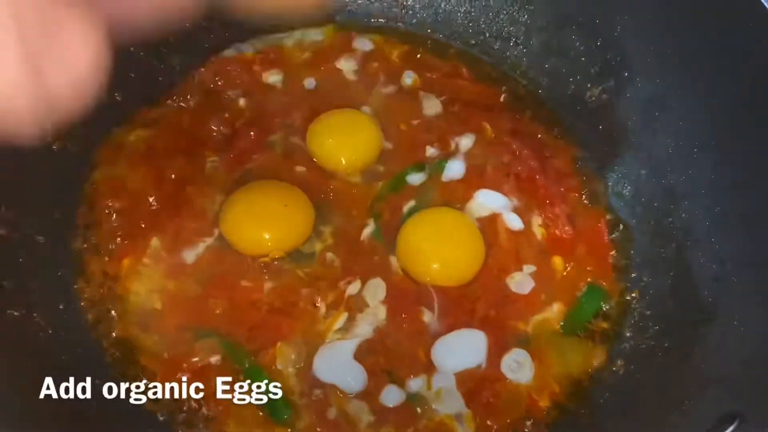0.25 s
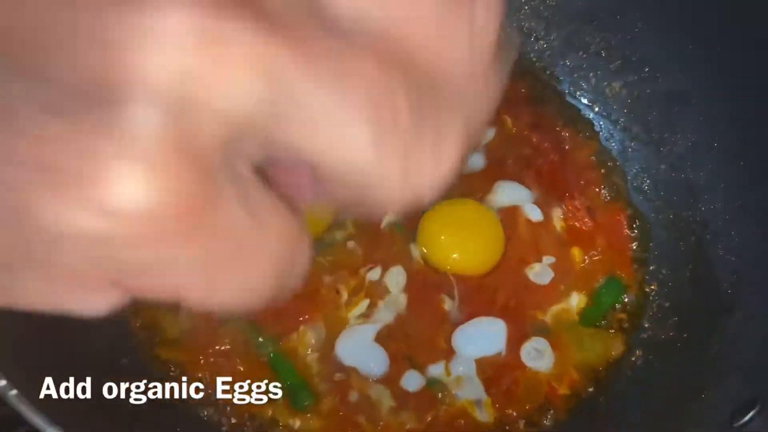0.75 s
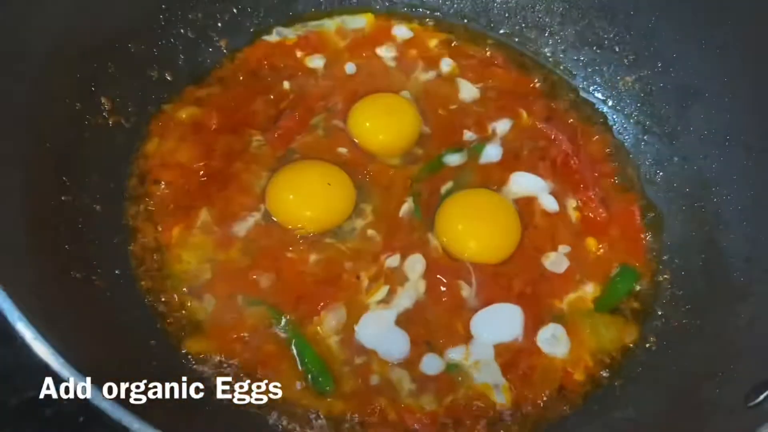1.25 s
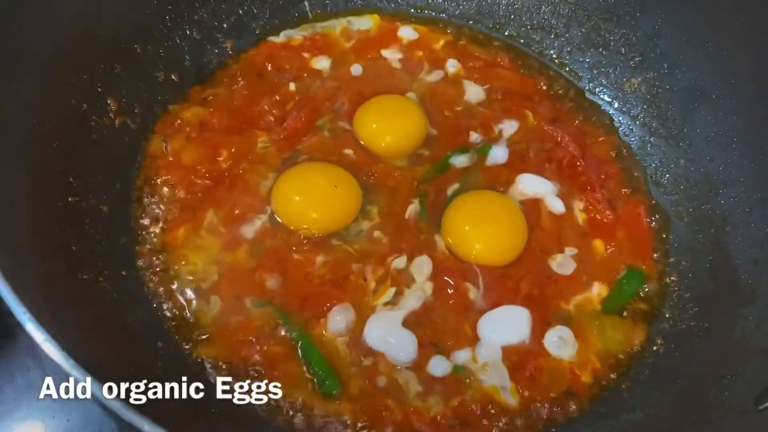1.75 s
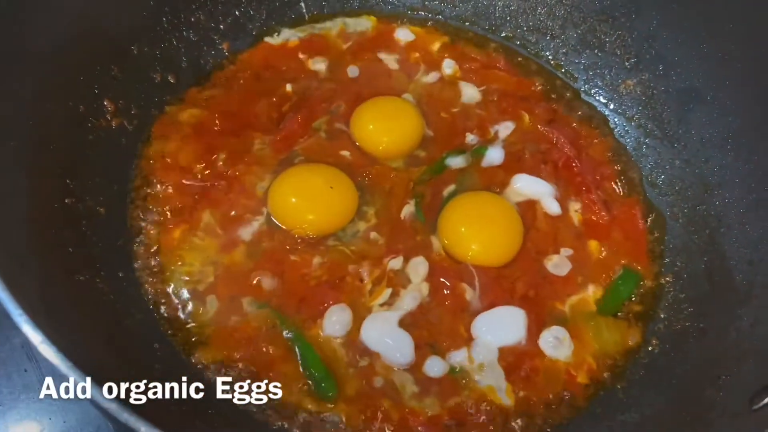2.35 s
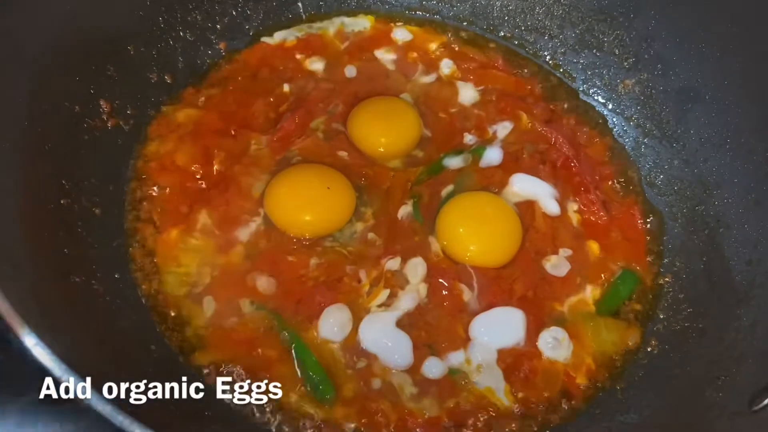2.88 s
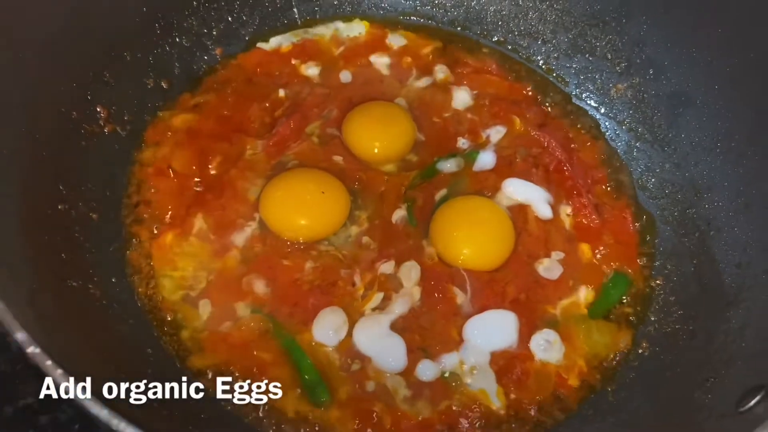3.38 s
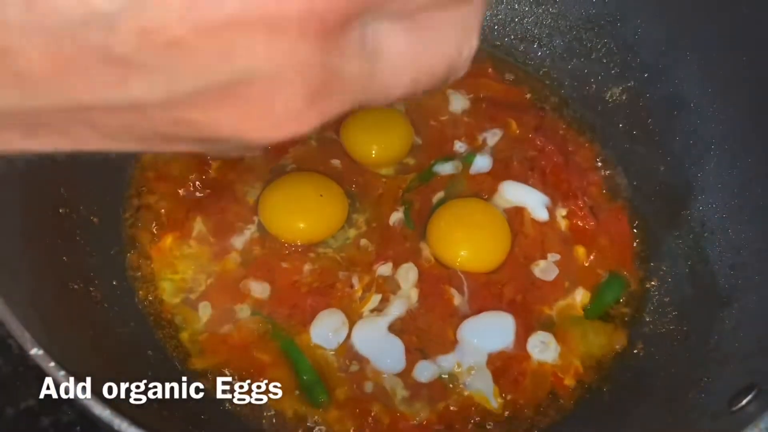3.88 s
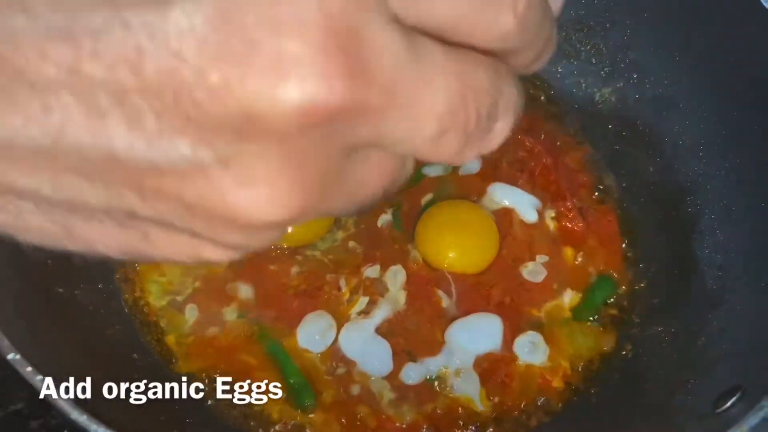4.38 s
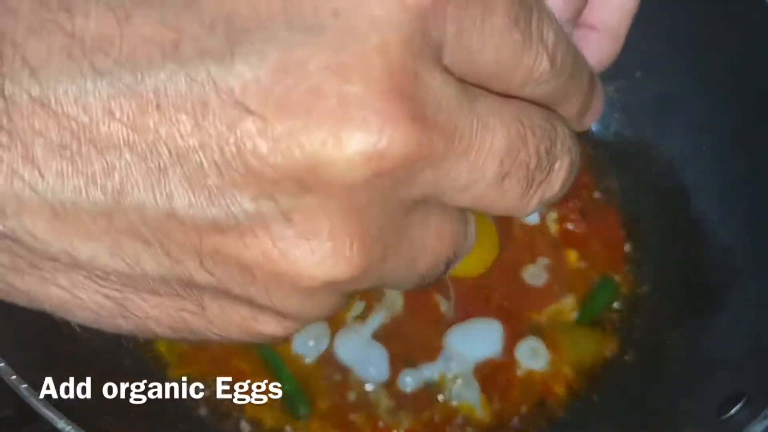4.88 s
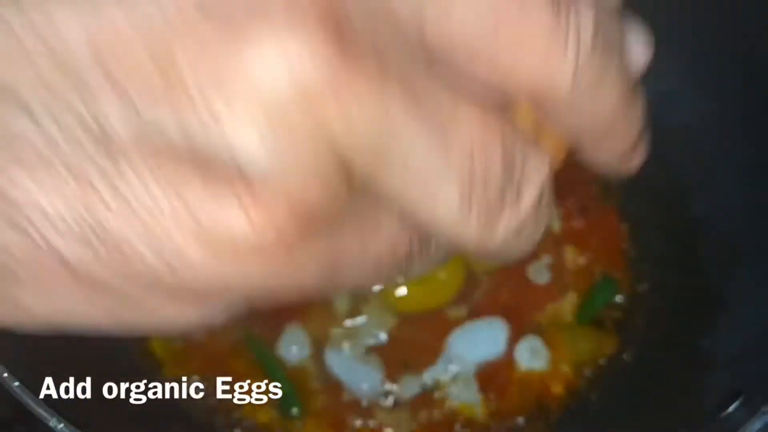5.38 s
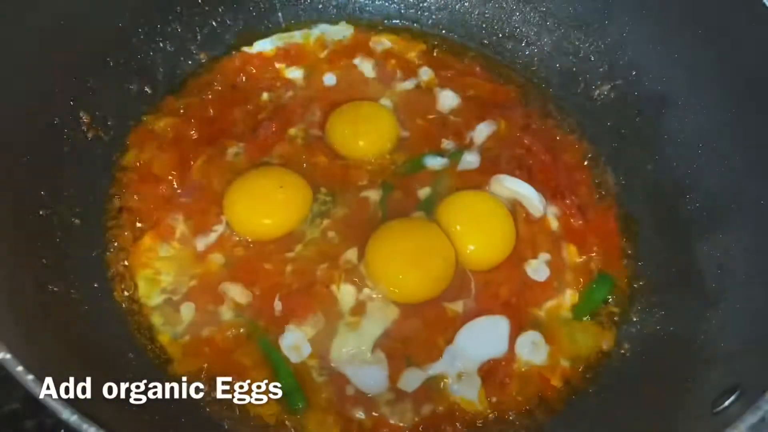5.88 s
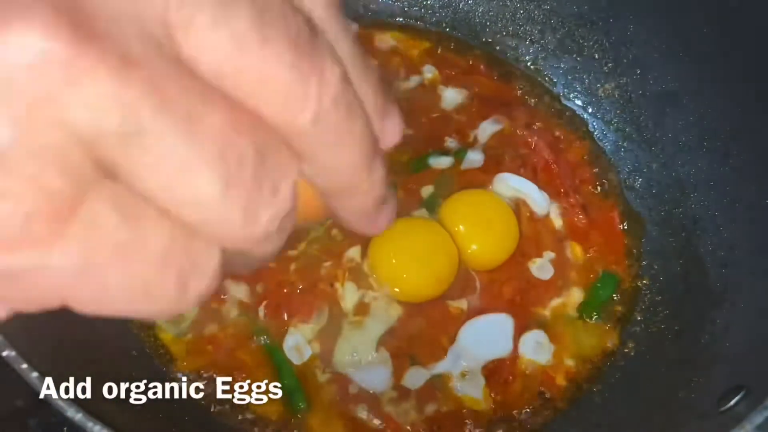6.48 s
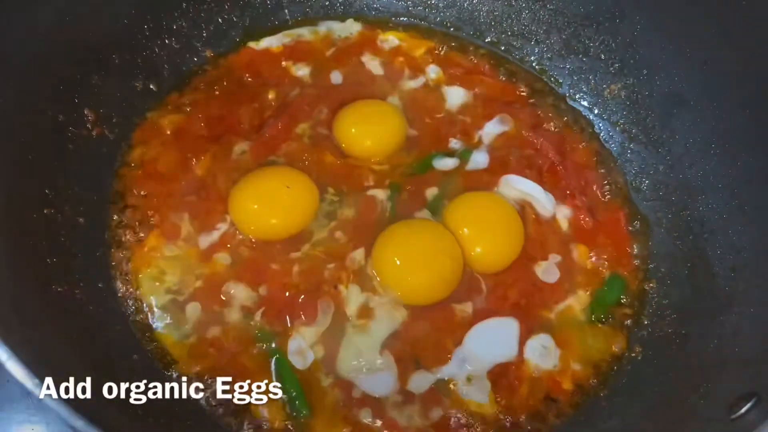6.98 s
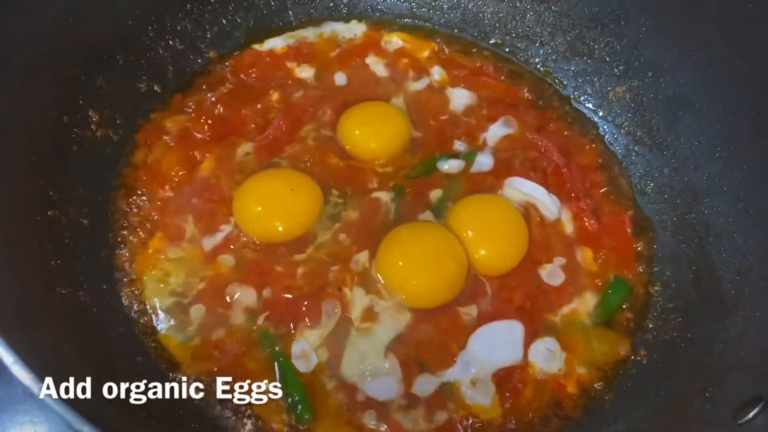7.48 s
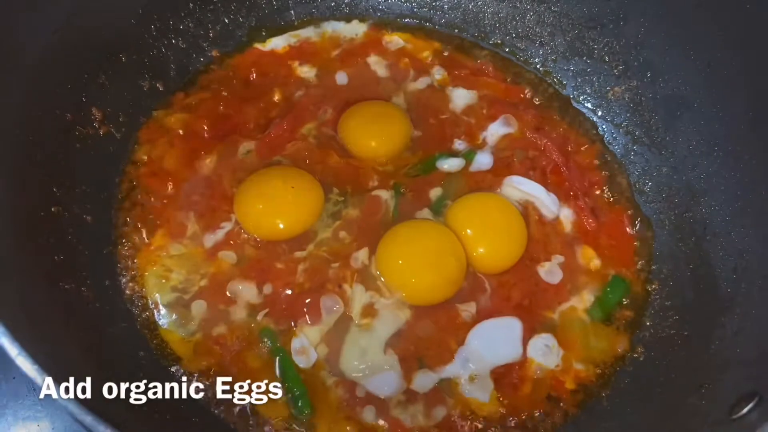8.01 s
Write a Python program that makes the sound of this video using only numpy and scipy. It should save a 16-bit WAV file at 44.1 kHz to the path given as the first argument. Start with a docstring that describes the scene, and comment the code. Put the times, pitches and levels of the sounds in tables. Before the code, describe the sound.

Thick tomato sauce fries steadily in a pan above a low burner roar, hissing, plopping and spitting. Around one second, hollow eggshell pieces clack together. At about three seconds an egg smashes loudly on a counter, which booms briefly. After more frying and small flares, a shell is rapped on steel, crunching and ringing. Close stereo microphone, small kitchen.

```python
"""Masala sizzles in a pan over a roaring burner: filtered noise for hiss and roar, short dying tones for
bubbles, and clicks for spitting oil. Eggshell pieces clack as noise bursts through cup resonances.
An egg is smashed on the counter, heard as gritty bursts, thuds and booming modes; a later shell is rapped
with steel that crunches and rings. A small kitchen answers the egg sounds with a diffuse noise tail.
Left and right differ in phase and level, and are more alike in some bands than in others."""
import sys
import numpy as np
from scipy import signal
from scipy.fft import rfft, irfft, next_fast_len
from scipy.io import wavfile

SR = 44100
rng = np.random.default_rng(int(sys.argv[2]) if len(sys.argv) > 2 else 0)


def transcribe(u):
    """Save the signal u as a 16-bit wav file named by the first command-line argument.

    u: samples, shape (n,) or (channels, n), limited to [-1, 1]; the rate is SR.
    q: integer samples, one column per channel.
    """
    v = np.clip(np.atleast_2d(u).T, -1, 1)
    q = np.round(v * 32767).astype(np.int16)
    wavfile.write(sys.argv[1], SR, q)


N = 363825

# Spectrum of the burner roar: (frequency [Hz], relative level [dB])
ROAR_SPECTRUM = [(25, -40), (50, -3.5), (85, -2.5), (130, -2), (185, 0), (230, -5.5), (400, 0), (700, -1),
                 (1300, -5), (2100, -3), (2700, -4.5), (5000, -19.5)]
# Air resonances of the pan: (frequency [Hz], full width at half the lift [Hz], lift [dB])
PAN_RESONANCES = [(487, 33, 4.5), (1013, 314, 9), (1469, 194, 6.5), (1931, 30, 7.5), (3023, 180, 5),
                  (3500, 56, 8), (3840, 28, 8), (4180, 72, 7.5), (4400, 53, 1.5), (5030, 330, 3)]
# Spectrum of frying oil: (frequency [Hz], relative level [dB])
SIZZLE_SPECTRUM = [(500, -24), (1500, -16), (2300, -6), (2620, -12), (3050, -3), (4200, -2.5), (5100, -.7),
                   (6200, -2.6), (6700, -4.5), (7600, -3.5), (9500, -8), (12500, -11), (15800, -14.5)]
# Moments when the frying livens: (time of the height [s], lift [dB], spread [s])
FRYING_FLARES = [(1.5, 0.8, 0.55), (5.45, 5.5, 0.029), (6.49, 5.5, 0.021)]
# Largest bubbles: (time [s], level [dB], pitch [Hz], decay [cycles])
LARGE_BUBBLES = [(0.185, -19.5, 5200, 3.7), (.308, -14, 6000, 3.5), (0.346, -22, 5130, 4),
                 (.651, -22, 5050, 3), (.923, -19, 3840, 1.7), (1.264, -27, 5010, 4),
                 (1.511, -24, 4970, 3.7), (1.646, -18, 5060, 9.7), (1.945, -17, 5100, 2.7),
                 (2.05, -25, 4200, 4.4), (2.306, -20, 5020, 6.4), (2.691, -21, 1390, 1.4),
                 (3.276, -28, 1440, 1.5), (3.318, -22, 1420, 1), (3.392, -27, 1020, 1.17),
                 (3.769, -23, 4900, 2.2), (3.948, -22, 5470, 2.2), (4.222, -17, 4100, 1.8),
                 (4.228, -18, 3570, 2.1), (4.513, -20, 5020, 3), (4.653, -22, 4950, 3.5),
                 (4.823, -23, 5440, 3), (5.022, -15, 5100, 1.6), (5.116, -24, 5430, 2),
                 (5.35, -24.5, 5400, 6), (5.362, -29, 4080, 4.6), (5.604, -16, 2200, 0.48),
                 (5.7405, -16, 4750, 1.4), (5.788, -16, 5060, 1.8), (5.926, -24, 4200, 4),
                 (6.450, -18.5, 4830, 5.7), (6.695, -21.5, 4400, 4.5), (7.840, -19.5, 5140, 2.4),
                 (7.935, -21.5, 4890, 13), (8.019, -25, 3860, 4.2), (8.126, -23.5, 5000, 5)]
# Sharpest spits of oil: (time [s], level [dB])
OIL_SPITS = [(.957, -15), (2.628, -12.5), (2.691, -20), (2.921, -14.5), (3.769, -14.5), (4.035, -14),
             (4.971, -13), (5.116, -16.5), (5.709, -23), (5.740, -14), (5.788, -21), (6.403, -15),
             (6.733, -13), (7.034, -14)]
# Shell pieces knocking and crunching: (time [s], level [dB], cup resonance [Hz],
# lower mode relative to the main one [dB], decay [ms], splinters relative to the cup [dB])
SHELL_CLACKS = [(.947, -30.5, 3050, -12, 13, -2), (0.973, -34.5, 1950, -10, 26, -4),
                (0.988, -26, 1900, -4, 3.2, -16), (1.0415, -17.5, 2000, -14, 2, -14),
                (1.076, -16, 1950, 1, 2.44, -4.5), (1.156, -16, 1970, -13, 4.7, -10.5),
                (1.170, -29, 1950, -6, 3, -1), (1.53, -41, 1820, -6, 110, -12),
                (1.823, -24, 2590, -11, 6.4, -2), (3.108, -27, 2840, -9, 6, -8),
                (4.919, -27.5, 2240, -12, 7.3, 2.5)]
# Egg smashed on the counter: (time [s], level [dB], decay [ms])
EGG_SMASHES = [(3.1103, -10, 3.2), (3.1128, -8, 3.5), (3.1160, -11.5, 4.6), (3.151, -30, 3.5)]
# Spectrum of the smash: (frequency [Hz], relative level [dB])
SMASH_SPECTRUM = [(60, -18), (250, -14), (600, 5), (1000, -5), (1300, -2.5), (1650, 5.5), (2150, -2.5),
                  (2450, -17), (2900, -6), (3600, -5.5), (6000, -6), (6850, -1.5), (7400, -2.5),
                  (10500, -10.5), (16000, -19)]
# Dull shudders of the counter: (time [s], level [dB], centre frequency [Hz], decay [ms])
COUNTER_BUMPS = [(.952, -35.5, 403, 17), (.956, -35.5, 170, 15.7), (3.111, -37, 55, 100),
                 (3.113, -32, 151, 62), (3.122, -27, 480, 22), (3.160, -20, 410, 14), (3.2, -38, 312, 53),
                 (3.231, -31, 450, 16), (3.244, -37, 103, 110)]
# Soft, rounded thumps on the counter: (time [s], level [dB], pitch [Hz], swell [ms])
COUNTER_THUMPS = [(.954, -33.5, 93.5, 7.1), (3.1495, -12, 466, 2.1), (6.18, -41, 112, 8.2),
                  (7.381, -45, 106, 7.5), (8.029, -37, 377, 3.1), (8.039, -32, 132, 5.5),
                  (8.061, -32, 143, 5.8), (8.092, -40, 122, 15), (8.124, -41, 121, 7)]
# Booming modes of the counter: (frequency [Hz], level [dB], time to fall 60 dB [s])
COUNTER_MODES = [(91, -37.5, 2.5), (99.4, -50, 1.3), (111, -40, 1.2), (129, -32, .65), (187.4, -46.5, 2.5),
                 (249, -36, 0.8), (275.6, -32, 0.62), (399, -24.5, 0.29), (476, -29, 0.33),
                 (592, -27.5, 0.24), (930, -23.5, 0.2), (1550, -21.5, 0.096)]
# Steel against shell, which gives way in steps: (time [s], level relative to the crunch [dB], decay [ms])
STEEL_RAPS = [(7.372, -13, 5.9), (7.3795, 6, 4), (7.3839, 5, 5.2), (7.388, -20, 6.9)]
# Ringing modes of the steel: (frequency [Hz], level [dB], time to fall 60 dB [s])
STEEL_MODES = [(1410, -49, 0.27), (1950, -42, .2), (2440, -36, 0.2), (2515, -29, .2), (2533, -30, 0.42),
               (2600, -33, .15), (2600, -36, 0.16), (2730, -29, 0.18), (3720, -34, 0.2), (3820, -31, 0.44),
               (3920, -44, 0.22), (4020, -37, 0.16), (4100, -42, 0.28), (5087, -32, 0.21),
               (5303, -41, 0.16), (6550, -30, .2), (8890, -31, 0.16), (9846, -41, .18), (10150, -41, 0.186),
               (11650, -33, .15)]
# Spectrum of shell against steel: (frequency [Hz], relative level [dB])
RAP_SPECTRUM = [(100, -17.5), (1000, -7.5), (1300, -15), (1750, 3), (2250, -1), (2600, 14.5), (2850, 7),
                (3250, -10), (3800, 10.5), (4200, -3), (4650, -11), (5120, 3), (5650, -8), (6100, -2),
                (7300, -14), (8900, -9), (11000, -22), (14500, -27)]
# Decay of the small kitchen: (frequency [Hz], time to fall 60 dB [s])
KITCHEN_DECAY = [(80, 0.29), (300, 0.45), (1000, 0.19), (4000, 0.25), (14000, 0.014)]
# Phase between left and right: (frequency [Hz], lead of the left [rad])
PHASE_LEAD = [(100, 0), (600, .2), (1100, -.35), (2000, -.2), (2700, -2.8), (3200, -3), (3700, -5.3),
              (5400, -5.9), (7000, -3.25), (7700, -3.05), (9800, -.1), (11200, .1), (13000, 3.05),
              (14000, 3.25), (15600, 5.7)]
# Likeness of left and right: (frequency [Hz], coherence [0 to 1])
LIKENESS = [(70, .995), (130, .975), (300, .9), (550, .68), (950, .85), (1400, .8), (1900, .87),
            (2500, .55), (4500, .45), (5300, .78), (6200, .78), (7300, .98), (9000, .75), (10400, .97),
            (12000, .72), (13500, .97), (15500, .65)]
# Balance of left and right: (frequency [Hz], left minus right [dB])
BALANCE = [(100, -.4), (480, -1.5), (750, 3.5), (1000, 4.2), (1700, .8), (2500, -.3), (4200, -3),
           (5100, .5), (8000, 0)]

SPIT_HZ, SPIT_CYCLES = 10000, 1
FLICKER_DB, SPUTTER_PER_S, CRACKLE_PER_S = 1.2, 55, 45
BUMP_WIDTH = 0.47  # share of the centre frequency
BUMP_RISE_CYCLES = 0.72  # a low bump builds more slowly than a high one
CUP_LOWER_RATIO = 0.804  # lower mode of a shell cup, as a share of the main pitch
EDGE_HZ = 15900  # upper band limit


def amp(db):
    """Decibels to gain."""
    return 10 ** (np.asarray(db) / 20)


def unit(x):
    """Scales to an rms of one."""
    return x / np.sqrt(np.mean(x ** 2) + 1e-20)


def read(points, hz):
    """Reads a table along a logarithmic frequency axis."""
    f, value = np.transpose(points)
    return np.interp(np.log(hz + 1), np.log(f), value)


def add(mix, s, sound):
    """Mixes a sound in at time s, cut off at the end of the scene."""
    part = mix[..., round(s * SR):][..., :sound.shape[-1]]
    part += sound[..., :part.shape[-1]]


def colour(x, gain_at):
    """Causal, minimum-phase filter with the given gain over frequency."""
    size = next_fast_len(x.shape[-1] + 4096)
    hz = abs(np.fft.fftfreq(size, 1 / SR))
    log_gain = np.log(np.maximum(gain_at(hz), 1e-5))
    # The Hilbert transform of the log gain supplies the matching phase
    response = np.exp(np.conj(signal.hilbert(log_gain)))[:size // 2 + 1]
    return irfft(rfft(x, size) * response, size)[..., :x.shape[-1]]


def hump(hz, centre_hz, width_hz):
    """Gain of a resonance, halved about width_hz away from its centre."""
    detuning = (hz ** 2 - centre_hz ** 2) / (2 * (hz + 1) * width_hz)
    return 1 / (1 + detuning ** 2)


def drift(per_s):
    """Slow random wander of rms one."""
    knots = rng.standard_normal(int(N / SR * per_s) + 2)
    return unit(np.interp(np.linspace(0, len(knots) - 1, N), np.arange(len(knots)), knots))


def burst(decay_ms, gain_at, grit_db=6.0, rise_ms=0):
    """Tiny uneven fractures build and die through a body; rows are the direct and the scattered sound."""
    decay = decay_ms / 1000
    t = np.arange(int((6 * decay + .04) * SR)) / SR
    rise = 1 - np.exp(-1000 * t / (rise_ms + 1e-3))
    fade = np.exp(-t / decay) * rise
    grit = amp(grit_db * rng.standard_normal(len(t)))
    fractures = rng.standard_normal((2, len(t))) * grit
    return unit(colour(fractures * fade, gain_at)) * np.sqrt(np.mean(fade ** 2))


def ring(modes, rise_s):
    """Struck modes, each dying at its own speed, over one second."""
    t = np.arange(SR) / SR
    tones = np.zeros((2, SR))
    for hz, db, t60 in modes:
        phase_turns = rng.random((2, 1))
        tones += amp(db - 60 * t / t60) * np.sin(2 * np.pi * (hz * t + phase_turns))
    return tones * (1 - np.exp(-t / rise_s))


def hollow_db(hz):
    """Lift that the air resonances of the pan give to each frequency."""
    return sum(db / (1 + (2 * (hz - f) / width) ** 2) for f, width, db in PAN_RESONANCES)


def burner(level_db=-42.0, flutter_db=1.46):
    """Steady noise roar, fluttering a little, that gathers in the hollow of the pan."""
    noise = rng.standard_normal((2, N))
    roar = colour(noise, lambda hz: amp(read(ROAR_SPECTRUM, hz) + hollow_db(hz)))
    return amp(level_db + flutter_db * drift(40)) * unit(roar)


def fizz(per_s, spread_db, low_cycles, high_cycles, low_hz=1500, high_hz=16000, size=320):
    """Tiny bubbles as dying tones of random pitch, a few much stronger than the rest."""
    count, t = int(per_s * N / SR), np.arange(size) / SR
    when, pitch, length, rank = rng.random((count, 4)).T[..., None]
    hz = low_hz + (high_hz - low_hz) * pitch
    decay = low_cycles * (high_cycles / low_cycles) ** length / hz
    strength = amp(spread_db * np.minimum(-np.log(1 - rank), 4.5))
    tones = np.exp(-t / decay) * np.sin(2 * np.pi * hz * t)
    grains = strength * tones / np.sqrt(decay)  # long and short rings carry similar energy
    at = (when * N).astype(int) + np.arange(size)
    return np.bincount(at.ravel(), grains.ravel(), minlength=N)[:N]


def simmer(plop_db=-53):
    """Thick sauce plops: low, short bubble tones at random times."""
    plops = [fizz(per_s=130, spread_db=3.4, low_cycles=0.8, high_cycles=5, low_hz=790, high_hz=2320)
             for _ in range(2)]
    return amp(plop_db) * unit(np.array(plops))


def sizzle(hiss_db=-44.5, bubble_db=-46.5, spit_db=-49.0, wander_db=0.06):
    """A smooth hiss of steam under ringing bubbles and dry spits; all three follow the heat."""
    bubbles = [fizz(per_s=1800, spread_db=3.2, low_cycles=4, high_cycles=30, size=512) for _ in range(2)]
    spits = [fizz(per_s=650, spread_db=4.2, low_cycles=.4, high_cycles=1.6, size=64) for _ in range(2)]
    oil = amp(hiss_db) * rng.standard_normal((2, N))
    oil += amp(bubble_db) * unit(np.array(bubbles))
    oil += amp(spit_db) * unit(np.array(spits))
    t = np.arange(N) / SR
    flare_db = sum(db * np.exp(-((t - s) / spread_s) ** 2) for s, db, spread_s in FRYING_FLARES)
    heat_db = flare_db + wander_db * drift(2) + FLICKER_DB * drift(70)
    fried = colour(oil, lambda hz: amp(read(SIZZLE_SPECTRUM, hz) + hollow_db(hz)))
    return np.std(oil) * unit(fried) * amp(heat_db)


def pop(hz, cycles):
    """One bursting bubble: a tone that dies within a few cycles."""
    t = np.arange(1024) / SR
    return np.exp(-t * hz / cycles) * np.sin(2 * np.pi * hz * t)


def wall(x, decay_s):
    """The wall of the pan scatters a sound for a few milliseconds, differently in each row."""
    t = np.arange(1024) / SR
    echoes = rng.standard_normal((2, len(t))) * np.exp(-t / decay_s)
    return signal.oaconvolve(x[None], echoes / np.linalg.norm(echoes[0]), axes=1)[:, :len(x)]


def sputter(level_db=-53, spread_db=1.8, low_hz=3500, high_hz=5700, cycles=3, decay_s=0.004):
    """Middling bubbles burst all over the pan, each scattered in its own way."""
    out = np.zeros((2, N))
    for when, pitch, rank in rng.random((int(SPUTTER_PER_S * N / SR), 3)):
        strength = amp(spread_db * min(-np.log(1 - rank), 4))
        bubble = pop(low_hz + (high_hz - low_hz) * pitch, cycles)
        add(out, when * N / SR, strength * wall(bubble, decay_s))
    return amp(level_db) * unit(out)


def crackle(level_db=-52.0, spread_db=3.5, decay_ms=0.42, wall_db=-3.0, wall_s=0.0065):
    """Water droplets snap in the hot oil: sharp noise clicks with the colour of the sizzle."""
    t, out = np.arange(128) / SR, np.zeros((2, N))
    for when, rank in rng.random((int(CRACKLE_PER_S * N / SR), 2)):
        snap = unit(rng.standard_normal(len(t)) * np.exp(-1000 * t / decay_ms))
        snap = snap * amp(spread_db * min(-np.log(1 - rank), 3.5))
        add(out[0], when * N / SR, snap)
        add(out, when * N / SR, amp(wall_db) * wall(snap, wall_s))
    return amp(level_db) * unit(colour(out, lambda hz: amp(read(SIZZLE_SPECTRUM, hz))))


def pops(wall_db=-2, wall_s=0.0073):
    """Larger bubbles ring, spits hardly at all; the wall of the pan scatters each."""
    out = np.zeros((2, N))
    spits = [(s, db, SPIT_HZ, SPIT_CYCLES) for s, db in OIL_SPITS]
    for s, db, hz, cycles in list(LARGE_BUBBLES) + spits:
        direct = amp(db) * pop(hz, cycles)
        add(out[0], s, direct)
        add(out, s, amp(wall_db) * wall(direct, wall_s))
    return out


def shells(cup_width_hz=140, splinter_hz=5800, splinter_width_hz=3800, rise_ms=0.16):
    """Shell pieces: the hollow cup gives a short pitched clack, the breaking rim bright splinters."""
    def splinters(hz):
        """Colour of the breaking rim."""
        return hump(hz, splinter_hz, splinter_width_hz)
    out = np.zeros((2, N))
    for s, db, cup_hz, lower_db, decay_ms, splinter_db in SHELL_CLACKS:
        def cup(hz):
            """The two modes of this piece."""
            lower = amp(lower_db) * hump(hz, CUP_LOWER_RATIO * cup_hz, cup_width_hz)
            return hump(hz, cup_hz, cup_width_hz) + lower
        add(out, s, amp(db) * burst(decay_ms, cup, rise_ms=rise_ms))
        add(out, s, amp(db + splinter_db) * burst(decay_ms, splinters, rise_ms=rise_ms))
    return out


def thump(hz, swell_ms):
    """A padded blow: a smooth tone that swells and dies."""
    t = np.arange(SR // 4) / SR
    age = 1000 * t / swell_ms
    return age * np.exp(1 - age) * np.sin(2 * np.pi * hz * t)


def counter(bump_grit_db=1.5):
    """The shell caves in against the counter, which thuds and booms."""
    out = np.zeros((2, N))
    for s, db, decay_ms in EGG_SMASHES:
        add(out, s, amp(db) * burst(decay_ms, lambda hz: amp(read(SMASH_SPECTRUM, hz))))
    for s, db, centre_hz, decay_ms in COUNTER_BUMPS:
        rise_ms = 1000 * BUMP_RISE_CYCLES / centre_hz
        def body(hz):
            """Broad resonance of this shudder."""
            return hump(hz, centre_hz, BUMP_WIDTH * centre_hz)
        add(out, s, amp(db) * burst(decay_ms, body, bump_grit_db, rise_ms))
    for s, db, hz, swell_ms in COUNTER_THUMPS:
        add(out[0], s, amp(db) * thump(hz, swell_ms))
    add(out, EGG_SMASHES[0][0], ring(COUNTER_MODES, rise_s=0.01))
    return out


def steel(crunch_db=-12, rise_ms=1.9, rattle_db=-30.0, rattle_ms=38,
          splinter_db=-32.0, splinter_ms=30, splinter_hz=10500, splinter_width_hz=3200):
    """Shell crunches and sprays splinters; the steel rings on and rattles against the broken edge."""
    def contact(hz):
        """Colour of shell against steel."""
        return amp(read(RAP_SPECTRUM, hz))
    out = np.zeros((2, N))
    for s, db, decay_ms in STEEL_RAPS:
        add(out, s, amp(crunch_db + db) * burst(decay_ms, contact, rise_ms=rise_ms))
    strike_s, rattle_s = STEEL_RAPS[1][0], STEEL_RAPS[-1][0]
    add(out, strike_s, ring(STEEL_MODES, rise_s=0.0018))
    spray = burst(splinter_ms, lambda hz: hump(hz, splinter_hz, splinter_width_hz))
    add(out, strike_s, amp(splinter_db) * spray)
    add(out, rattle_s, amp(rattle_db) * burst(rattle_ms, contact))
    return out


def kitchen(x, rise_s=0.0042):
    """Diffuse tail of a small room: noise whose bands die separately, the top treble first."""
    hz, t, z = signal.stft(rng.standard_normal((2, SR)), SR, nperseg=256)
    z = z * amp(-60 * t / read(KITCHEN_DECAY, hz)[:, None])
    z = z * (1 - np.exp(-t / rise_s))
    tail = signal.istft(z, SR, nperseg=256)[1]
    return signal.oaconvolve(x, tail / np.linalg.norm(tail[0]), axes=1)[:, :N]


def stereo(pair):
    """Left and right share the direct sound, offset in phase and level; scattered sound sets them apart."""
    size = next_fast_len(N + 2048)
    hz = np.fft.rfftfreq(size, 1 / SR)
    direct, scattered = rfft(pair, size)
    likeness = np.clip(read(LIKENESS, hz), 0, 1)
    shared = direct * np.sqrt((1 + likeness) / 2)
    apart = scattered * np.sqrt((1 - likeness) / 2)
    # Each side takes half of the level and phase difference
    lean = amp(read(BALANCE, hz) / 2) * np.exp(.5j * read(PHASE_LEAD, hz))
    return irfft(np.array([(shared + apart) * lean, (shared - apart) / lean]), size)[:, :N]


def scene(shell_room_db=-20, counter_room_db=-15, steel_room_db=-11):
    """The pan stays dry; the egg sounds also feed the kitchen; the sum is spread to left and right."""
    shell, knock, rap = shells(), counter(), steel()
    room = kitchen(amp(shell_room_db) * shell + amp(counter_room_db) * knock + amp(steel_room_db) * rap)
    pan = burner() + simmer() + sizzle() + sputter() + crackle() + pops()
    return stereo(pan + shell + knock + rap + room)


def record(dry, low_cut_hz=38):
    """The microphone loses the deepest bass; the hardest peaks clip; then the band limit."""
    bass_cut = signal.butter(4, low_cut_hz, "highpass", fs=SR, output="sos")
    thin = signal.sosfilt(bass_cut, dry)
    clipped = np.clip(thin, -.85, .85)
    edge = signal.firwin(511, EDGE_HZ, window=("kaiser", 9), fs=SR)
    return signal.oaconvolve(clipped, edge[None], "same")


dry = scene()
out = record(dry)
transcribe(out)
```